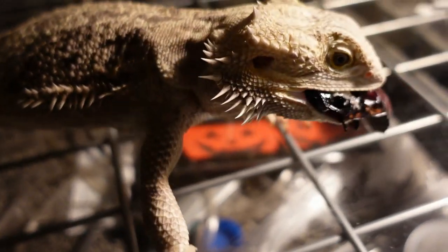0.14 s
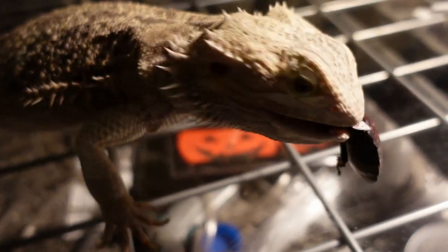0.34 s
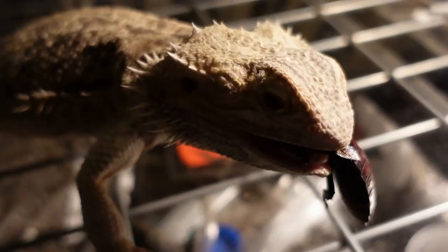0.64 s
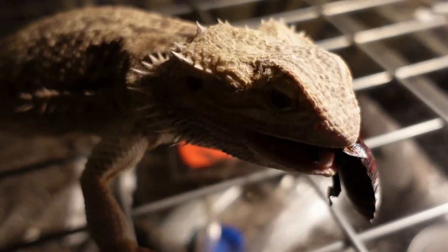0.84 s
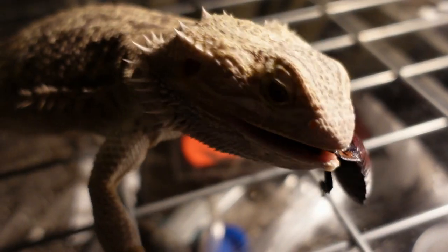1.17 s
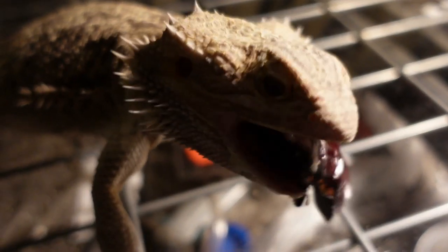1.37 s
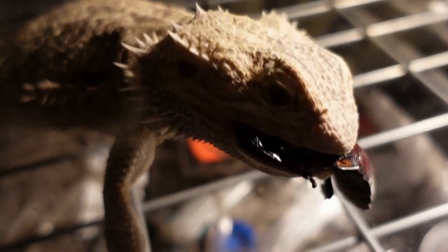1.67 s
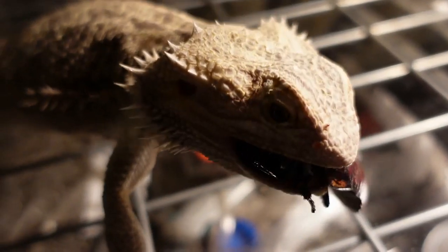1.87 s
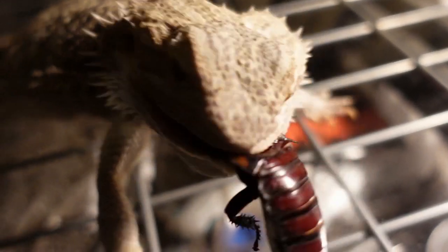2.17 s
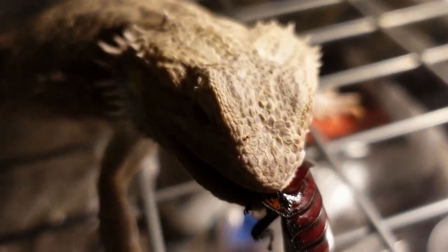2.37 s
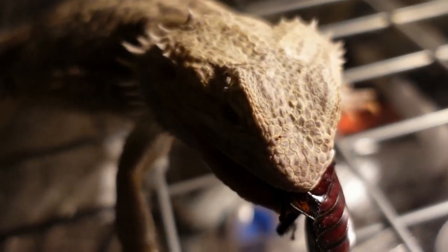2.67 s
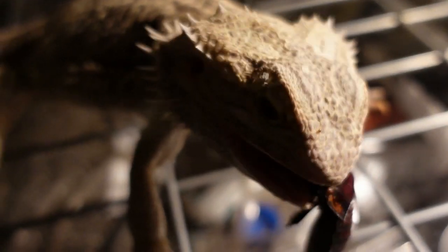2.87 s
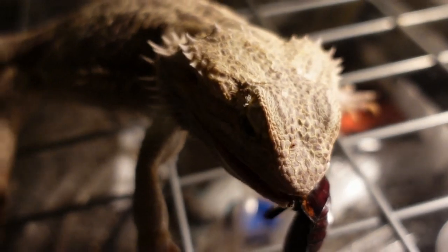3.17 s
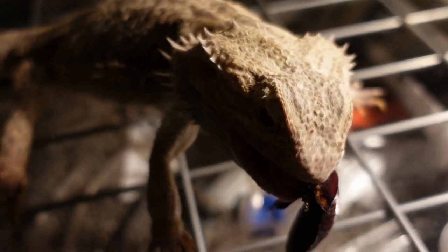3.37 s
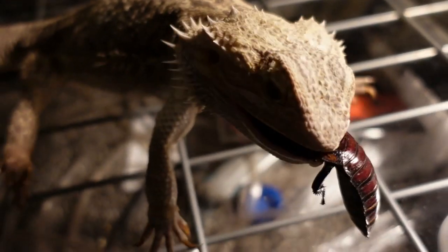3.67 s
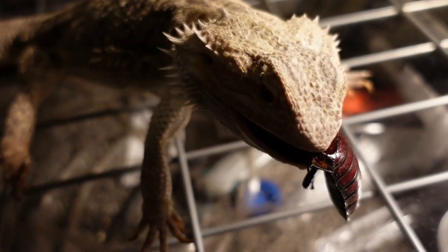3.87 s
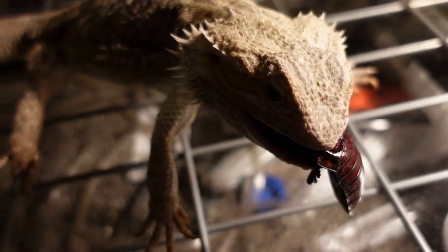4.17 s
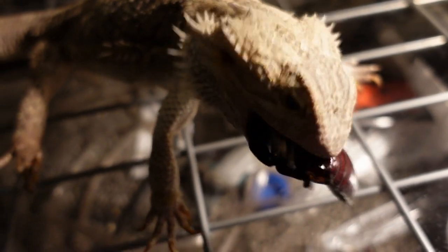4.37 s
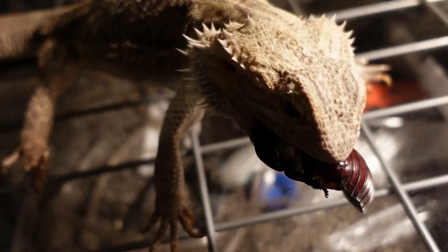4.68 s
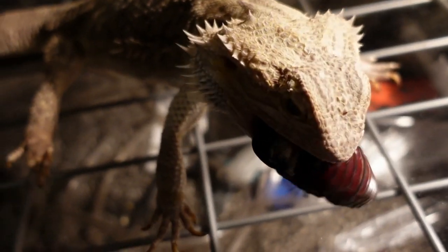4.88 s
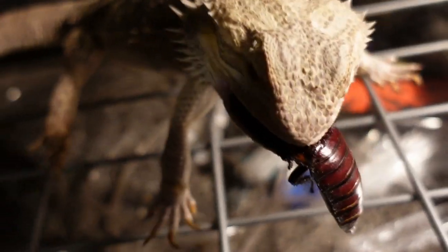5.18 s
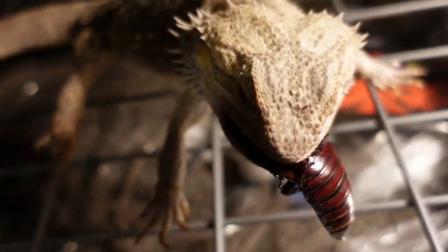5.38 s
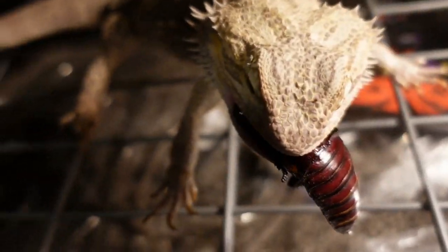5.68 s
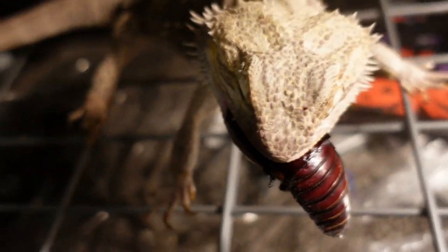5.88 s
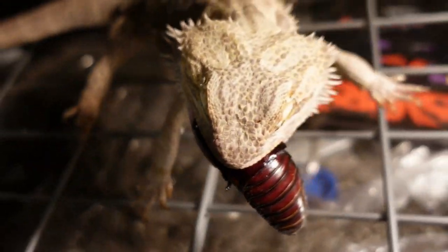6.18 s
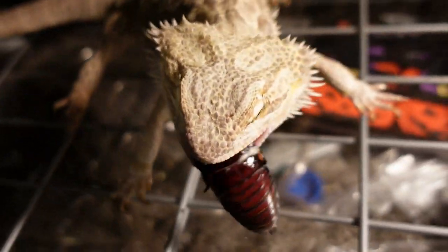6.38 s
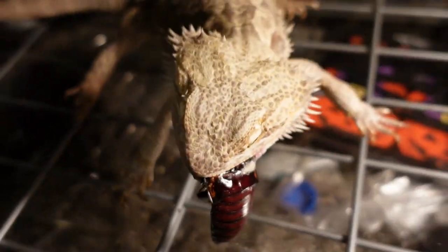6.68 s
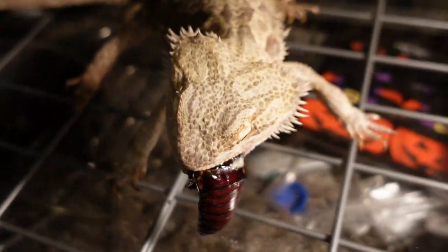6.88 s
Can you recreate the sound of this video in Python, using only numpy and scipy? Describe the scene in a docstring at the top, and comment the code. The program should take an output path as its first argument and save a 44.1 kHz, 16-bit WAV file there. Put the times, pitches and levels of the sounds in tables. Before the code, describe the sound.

A lizard chews a hard-shelled insect with sharp, irregular crunches, close up, over a faint steady motor hum.

```python
"""Lizard chewing an insect

A lizard on a wire floor chews a hard-shelled insect, close up and in stereo. The shell cracks,
crushes and squeaks between the jaws; the hollow head knocks and a film of spit pops once.
Nearby walls and the room answer. Behind a faint rustle, two motors hum against each other
over the airy hiss of the room."""
import sys
import numpy as np
from scipy import signal
from scipy.fft import rfft, irfft
from scipy.io import wavfile
from scipy.ndimage import uniform_filter1d

SR = 44100
rng = np.random.default_rng(int(sys.argv[2]) if len(sys.argv) > 2 else 0)


def file_out(sig):
    """Save sig as 16-bit WAV at sys.argv[1]."""
    # one column per channel
    cols = np.atleast_2d(sig).T
    # limit, then scale
    lim = np.clip(cols, -1, 1)
    pcm = np.round(lim * 32767).astype(np.int16)
    wavfile.write(sys.argv[1], SR, pcm)


N = 310023


def cracks():
    """Each crack is a snap followed by grainy splinters that fly from slightly different places."""
    # breaks in the shell: start_s, level_db, pitch_hz, treble_db (relative to the pitched part)
    snaps = [(0.0608, -42.5, 8900, 7), (0.071, -38, 4400, -18), (0.2109, -47, 6380, -15),
             (0.226, -41.5, 3500, -3), (0.2684, -22, 8900, -14), (0.271, -24, 4600, -7),
             (0.29, -33, 6500, -2), (0.305, -47, 5000, 3), (0.331, -28, 3340, -27),
             (0.3685, -36.5, 7940, 4), (0.545, -37.5, 6700, 2), (0.59, -44, 3380, -15),
             (0.602, -34.5, 6400, 2), (1.046, -32, 3630, 1), (1.061, -32.5, 2970, -10),
             (1.133, -28, 4760, -24), (1.1443, -20, 4200, -30), (1.152, -22.5, 4960, -8),
             (1.176, -21, 4300, -4), (1.212, -32.5, 6330, -4), (1.2402, -35.5, 9050, 13.5),
             (1.252, -33.5, 5100, -3), (1.3903, -33, 4560, 0), (1.4113, -33.5, 4550, -3),
             (1.4253, -21, 8400, -17), (1.4415, -20, 6400, -8), (1.472, -28, 4400, -10),
             (1.488, -24, 4100, -17), (1.495, -33, 3900, -15), (1.5233, -31, 7500, -5),
             (1.526, -21, 4170, -4), (1.5508, -25.5, 3750, -9), (1.7165, -32, 5370, -8),
             (1.7602, -37.5, 4200, -3.5), (1.969, -40, 5100, -2), (1.9863, -35.5, 3520, 0),
             (2.0056, -22.5, 4140, 2.5), (2.0082, -21, 6840, -5.5), (2.0478, -21, 3850, -33),
             (2.066, -29.5, 3340, -23), (2.102, -34.5, 3460, 1), (2.123, -32, 3540, -3),
             (2.1536, -27, 4560, -11), (2.165, -20, 6800, -5), (2.1714, -22, 7600, -6),
             (2.273, -44, 4300, -10), (2.346, -41, 2770, -20), (2.356, -36, 7200, -10),
             (2.407, -29, 3480, -6), (2.457, -41, 4000, -7.5), (2.8336, -30.5, 4430, -15),
             (2.8465, -32.5, 3620, -5), (2.887, -34.5, 4100, -17), (2.9024, -31, 3500, -15),
             (2.955, -38, 4390, -19), (2.9679, -29, 6100, -20), (2.9829, -9.5, 4270, -6),
             (2.996, -11.5, 7200, -25), (3.0203, -17.5, 5600, -8), (3.053, -24.5, 6140, 4),
             (3.038, -21.5, 4970, -3), (3.066, -20, 9500, -11), (3.0715, -17.5, 5000, -5),
             (3.13, -40.5, 6860, -17), (3.155, -40.5, 4800, -10), (3.177, -88, 5040, 8),
             (3.195, -48.5, 5100, -2), (3.234, -60, 8500, 7), (3.2643, -41, 5420, -8),
             (3.4357, -28, 5200, -2.5), (3.4659, -28.5, 5470, 1), (3.4792, -29, 4130, -14),
             (3.5298, -28.5, 3770, -2), (3.5739, -19.5, 3910, 5.5), (3.61, -14.5, 4740, -9),
             (3.628, -21, 7300, -8), (3.638, -24, 5970, -22), (3.6544, -18, 6900, -7),
             (3.8327, -31.5, 5000, -8), (3.8387, -26.5, 6550, -26), (4.3153, -35, 6000, -6),
             (4.3272, -34, 5500, 3.5), (4.339, -28.5, 3800, -12), (4.3494, -30, 3420, 3.5),
             (4.3832, -32, 8700, -18), (4.399, -28.5, 4000, -13), (4.447, -26.5, 5060, -11),
             (4.463, -26, 5570, 0.5), (4.548, -46, 8100, 9.5), (4.5728, -39, 8900, -9),
             (4.6758, -42.5, 5900, -5), (4.812, -50.5, 6200, -4), (4.9074, -25.5, 5540, -10),
             (4.926, -40, 3050, 1), (4.9472, -30, 8990, -22), (5.0098, -28, 4000, -24),
             (5.0422, -30, 3850, -13), (5.0903, -26, 6700, 1), (5.3864, -42.5, 5550, -23),
             (6.133, -47.5, 4760, -26), (6.1848, -48.5, 3900, -34), (6.3966, -33.5, 3630, -16),
             (6.4043, -27.5, 5800, -11), (6.423, -27.5, 3640, -7), (6.4427, -41, 5000, -13),
             (6.4592, -30, 4850, -35), (6.471, -30, 3850, -29), (6.496, -39, 4500, -20),
             (6.5408, -35, 3740, 5), (6.5467, -20.5, 4100, 0), (6.5615, -17.5, 7100, -10),
             (6.6073, -24.5, 6350, -14), (6.6183, -29.5, 5050, 3), (6.696, -41, 5110, 3),
             (6.704, -32.5, 6850, -5), (6.811, -51, 6000, 3)]
    splinter_db, splinter_t60_s = -13, .058
    out, s = np.zeros((2, N + SR)), np.arange(SR // 12) / SR
    for (at, db, hz, treble_db), noise in zip(snaps, rng.standard_normal((len(snaps), 5, len(s)))):
        grain = undb(2.2 * np.repeat(noise[4], 40)[:len(s)])
        splinters = undb(splinter_db) * grain * fade(s, splinter_t60_s) * (1 - fade(s, 0.0027))
        burst = noise[:2] * (fade(s, 0.0028) + splinters)
        burst[:, 0] = [2.1, .6]  # a hard first click for body and top
        mid = shell(burst, hz, treble_db, db)
        side = undb(-16.5) * shell(noise[2:4] * splinters, hz, treble_db + 1, db)
        i = int(at * SR)
        out[:, i:i + len(s)] += undb(db) * stereo(mid, side)
    return out[:, :N]


def shell(drive, hz, treble_db, crack_db):
    """The piece of shell that breaks: its own pitch on a broad crackle, and a fine top."""
    body_drive, top_drive = drive
    note = band(body_drive, hz / 1.177, hz * 1.155)
    # the insect is too small to radiate low notes, so the crackle falls off steeply below
    crackle = band(band(body_drive, 3110, 6900), 960, 18000)
    tick_db = -39.5  # weaker cracks lose crackle and thin to a tick
    crackle_db = -3.5 + 0.51 * min(crack_db - tick_db, 0)
    top = band(band(top_drive, 7000, 13000), 5200, 12500)
    return peak(note + undb(crackle_db) * crackle, 0) + peak(top, treble_db)


def crushes():
    """Grit swells and dies as the jaws press a piece of shell flat."""
    # presses of the jaws: centre_s, level_db, half_length_s, brightness_db (per octave)
    presses = [(0.018, -45.5, 0.025, -2), (0.082, -40, 0.026, -0.5), (0.31, -33.5, 0.015, 8),
               (0.33, -36.5, 0.022, 0), (0.747, -44.5, 0.012, -0.5), (0.908, -45.5, 0.011, -5),
               (1.097, -35, 0.011, -2), (1.116, -30, 0.007, -3), (1.154, -26.5, 0.019, -1.5),
               (1.229, -33, 0.018, 4), (1.336, -48.5, 0.03, -13), (1.45, -28, 0.0092, 7),
               (1.497, -32, 0.028, -0.5), (1.657, -45.5, 0.019, -7), (1.736, -42, 0.013, 6),
               (2.016, -31, 0.014, 5), (2.064, -35.5, 0.03, 1.1), (2.112, -34.5, 0.022, .3),
               (2.174, -26, 0.012, -2), (2.917, -39.5, 0.019, -2.5), (2.999, -27, 0.019, 4.1),
               (3.039, -26, 0.013, 0.6), (3.069, -33.5, 0.018, -2.1), (3.517, -40.5, 0.016, -1),
               (3.542, -37.5, 0.026, 3), (4.426, -35.5, 0.044, .3), (4.472, -29.5, 0.012, 2),
               (4.491, -40, 0.032, 3.5), (4.974, -34.5, 0.021, 1.3), (5.039, -38.5, 0.032, 1),
               (5.112, -34, 0.017, 10), (6.483, -40.5, 0.026, -8), (6.562, -29.5, 0.027, 3),
               (6.625, -34, 0.026, 5)]
    # tone of the crumbling shell: frequency_hz, gain_db
    grit_spectrum = [(1000, -14), (2000, -6.5), (2900, 2.5), (4200, 1.5), (6500, 0.5), (9000, -2.5),
                     (13000, -10.5), (16000, -20)]
    piece_hz, pitch_scatter = 4880, 0.24
    lead = SR // 10
    out, s = np.zeros(N + SR), np.arange(-lead, lead) / SR
    for at, db, half_s, bright_db in presses:
        hz = piece_hz * np.exp(pitch_scatter * rng.standard_normal())
        breaks = grit(per_s=4000, uneven_db=1.9, count=len(s))
        tilt = over_hz([(2500, -bright_db), (10000, bright_db)], len(s))
        crackle = irfft(rfft(breaks) * undb(over_hz(grit_spectrum, len(s)) + tilt), len(s))
        note = band(breaks, hz / 1.2, hz * 1.105)
        crunch = level(note, -20.5) + level(crackle, -13.5) + level(jaw(breaks), -20.5)
        i = int(at * SR)
        out[i:i + len(s)] += undb(db) * crunch * swell(s, half_s)
    return out[lead:N + lead]


def grit(per_s, uneven_db, count):
    """Dense tiny breaks of uneven size, rms 1."""
    breaks = (rng.random(count) < per_s / SR) * rng.standard_normal(count)
    size_db = uneven_db * np.minimum(rng.exponential(size=count), 3)
    return level(breaks * undb(size_db), 0)


def knocks():
    """Short rough pushes ring the hollow head and mouth, with a wet smack of their own."""
    # knocks of the jaw: start_s, level_db
    bites = [(0.224, -37), (0.325, -42), (0.367, -39.5), (1.044, -35), (1.152, -38), (1.175, -45.5),
             (1.366, -42.5), (1.389, -33), (1.523, -37.5), (1.55, -41), (1.967, -34.5), (2.09, -39),
             (2.152, -37.5), (2.833, -35.5), (2.999, -37.5), (3.434, -36.5), (3.575, -33), (3.637, -41),
             (4.327, -36), (4.924, -36.5), (4.948, -41), (5.058, -40), (5.104, -43.5), (6.403, -33.5),
             (6.545, -44.5), (6.568, -44), (6.615, -42.5)]
    push_hz, pitch_scatter = 730, 0.032
    rebound_s, rebound_hz, hard_db = .017, 1530, -35
    out, s = np.zeros(N + SR), np.arange(SR // 8) / SR
    for (at, db), noise in zip(bites, rng.standard_normal((len(bites), 2, 2, len(s)))):
        # a hard knock rebounds: the teeth meet again, higher; soft knocks barely do
        rebound_db = db - 4.5 + 2.4 * min(db - hard_db, 0)
        pitch = push_hz * np.exp(pitch_scatter * noise[0, 0, -1])
        contacts = (at, db, pitch), (at + rebound_s, rebound_db, rebound_hz)
        for (when, contact_db, hz), (push, wet) in zip(contacts, noise):
            ring = jaw(band(push * fade(s, 0.016), hz / 2.08, hz * 1.57))
            smack = band(wet * fade(s, 0.043), 190, 3000)
            i = int(when * SR)
            out[i:i + len(s)] += undb(contact_db) * (peak(ring, 0) + peak(smack, -2))
    return out[:N]


def jaw(push):
    """Head and mouth ring briefly; the gape shifts the high modes most, and those die first."""
    # resonances of the hollow head and mouth: pitch_hz, gain_db
    modes = [(510, -5), (670, 1.5), (780, 0.5), (1050, -4.5), (1400, -3.5), (1700, 6.5)]
    pivot_hz, gape_scatter, t60_s = 650, .022, .05  # scatter and decay hold at the pivot pitch
    s, ring = np.arange(SR // 16) / SR, 0
    for k, ((hz, db), gape) in enumerate(zip(modes, rng.standard_normal(len(modes)))):
        pitch = hz * np.exp(gape_scatter * (hz / pivot_hz) ** 1.6 * gape)
        decay = fade(s, t60_s * min(pivot_hz / hz, 1) ** .7)
        ring = ring + (-1) ** k * undb(db) * np.sin(2 * np.pi * pitch * s) * decay
    return signal.fftconvolve(push, ring)[:len(push)]


def squeaks():
    """Shell slides on a tooth, and the slips ring one narrow note."""
    # slides: centre_s, level_db, half_length_s, pitch_hz
    slides = [(2.269, -62, 0.0068, 5000), (3.51, -44, 0.0084, 3650), (3.53, -49.5, 0.0078, 3650),
              (3.565, -44, 0.0069, 3650)]
    width_hz = 380
    s, slips = np.arange(N) / SR, grit(per_s=1200, uneven_db=1.5, count=N)
    return sum(level(band(slips, hz - width_hz / 2, hz + width_hz / 2), db) * swell(s - at, half_s)
               for at, db, half_s, hz in slides)


def pop():
    """A film of spit bursts and the mouth sounds one round note."""
    centre_s, level_db, pitch_hz = 2.263, -44.5, 598
    s = np.arange(N) / SR - centre_s
    return undb(level_db) * np.sin(2 * np.pi * pitch_hz * s) * swell(s, half_s=0.0079)


def surroundings(x):
    """Direct sound, dense reflections from near walls, then the faint longer tail of the room."""
    wall_db, wall_t60_s, wall_delay_s = -7, 0.04, .0024
    room_db, room_t60_s = -15, 0.71
    pan_db = -1.0  # left against right
    s = np.arange(SR // 2) / SR
    mid, left, right, *far = rng.standard_normal((5, len(s)))
    walls = (mid + 0.43 * np.array([left, right])) * fade(s, wall_t60_s) * (s > wall_delay_s)
    room = band(np.array(far), 260, 2200) * fade(s, room_t60_s) * (1 - fade(s, 0.04))
    response = level(walls, wall_db) + level(room, room_db)
    echo = signal.fftconvolve(x, response / np.sqrt(len(s)), axes=1)[:, :N]
    return (x + echo) * undb([[pan_db / 2], [-pan_db / 2]])


def rustle():
    """A faint, flickering rustle swells around the bites."""
    # loudness of the rustle: time_s, level_db
    envelope = [(0.0, -65), (1.0, -65.5), (1.29, -57), (1.9, -66), (2.2, -62), (2.55, -77.5), (3.1, -68.5),
                (3.7, -68.5), (4.2, -83.5), (4.5, -72), (5.1, -67), (5.7, -87), (6.3, -75), (6.62, -56.5),
                (7.03, -73.5)]
    mid, side = band(rng.standard_normal((2, N)), 2500, 10000) * undb(2.5 * walk(25))
    return undb(over_time(envelope)) * level(stereo(mid, 0.5 * side), 0)


def motors():
    """Two motors hum in steady tones that beat against each other and waver a little."""
    # tones of the hum: pitch_hz, level_db (rms)
    tones = [(97.3, -63), (111.8, -56), (120.0, -66.5), (186.5, -75), (223.6, -71.5), (241.0, -75)]
    s, hum = np.arange(N) / SR, 0
    for hz, db in tones:
        amplitude = np.sqrt(2) * undb(db + 1.2 * walk(3))
        phase = 2 * np.pi * (hz * s + rng.random()) + 0.98 * walk(3.6)
        hum = hum + amplitude * np.sin(phase)
    return hum


def air():
    """Room hiss, centred in the bass and wide in the mids, with a rumble that swells."""
    # tone of the hiss: frequency_hz, gain_db
    spectrum = [(20, -44), (50, -30.5), (62, -14), (135, -14), (230, -17.5), (400, -19.5), (590, -19.5),
                (680, -16), (850, -23.5), (1800, -25), (2400, -29), (5800, -37.5), (7200, -44.5),
                (16000, -48)]
    # stereo image of the hiss: frequency_hz, likeness (0 wide, 1 mono)
    image = [(60, 1), (130, 0.92), (250, 0.55), (500, 0.64), (1300, 0.043), (4000, 0.28), (9000, 0.33),
             (15000, 1)]
    # loudness of the rumble: time_s, level_db
    rumble_envelope = [(0, -65.5), (.74, -64), (.78, -53), (.88, -61.5), (1.4, -61.5), (1.9, -69.5),
                       (7.03, -75.5)]
    alike = np.clip(over_hz(image, N), 0, 1)
    coloured = rfft(rng.standard_normal((2, N))) * undb(over_hz(spectrum, N))
    mid, side = coloured * np.sqrt([1 + alike, 1 - alike])
    hiss = level(irfft(stereo(mid, side), N), -59.5)
    mid, side = band(rng.standard_normal((2, N)), 171, 281)
    rumble = level(stereo(mid, .5 * side), 0) * undb(over_time(rumble_envelope) + 2.0 * walk(8))
    return hiss + rumble


def undb(db):
    """Decibels to gain."""
    return 10 ** (np.asarray(db) / 20)


def level(x, db):
    """Sets the rms level."""
    return x * undb(db) / np.sqrt(np.mean(x ** 2))


def peak(x, db):
    """Sets the peak level."""
    return x * undb(db) / np.abs(x).max()


def stereo(mid, side):
    """Mid and side to left and right."""
    return np.array([mid + side, mid - side])


def over_hz(table, count):
    """A (frequency_hz, value) curve at every bin of a transform of count samples."""
    hz, value = np.transpose(table)
    return np.interp(np.log(np.arange(count // 2 + 1) * SR / count + 1), np.log(hz), value)


def over_time(table):
    """A (time_s, value) curve at every sample."""
    return np.interp(np.arange(N) / SR, *np.transpose(table))


def band(x, lo_hz, hi_hz):
    """Band-pass."""
    sos = signal.butter(2, [lo_hz, min(hi_hz, .45 * SR)], "band", fs=SR, output="sos")
    return signal.sosfilt(sos, x)


def fade(s, t60):
    """Falls 60 dB in t60 seconds."""
    return np.exp(-np.log(1000) * s / max(t60, .001))


def swell(s, half_s):
    """Rises, holds and dies around s = 0."""
    return np.exp(-np.abs(s / max(half_s, .002)) ** 3)


def walk(rate):
    """Random levels held 1 / rate s and smoothed twice; spread near 1."""
    hold = int(SR / rate)
    steps = np.repeat(rng.standard_normal(N // hold + 1), hold)
    return 1.4 * uniform_filter1d(uniform_filter1d(steps, hold), hold)[:N]


def scene():
    """Chewing in its surroundings over rustle, hum and air."""
    chewing = cracks() + crushes() + knocks() + squeaks() + pop()
    return surroundings(chewing) + rustle() + motors() + air()


def record(dry):
    """A steep low-pass takes off the very top."""
    top_hz = 15900
    return signal.sosfilt(signal.ellip(8, .2, 70, top_hz, fs=SR, output="sos"), dry)


dry = scene()
out = record(dry)
file_out(out)
```